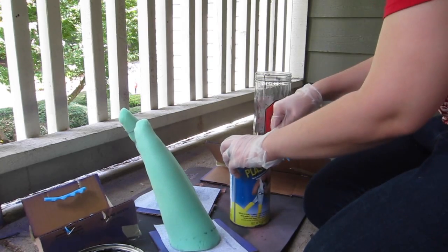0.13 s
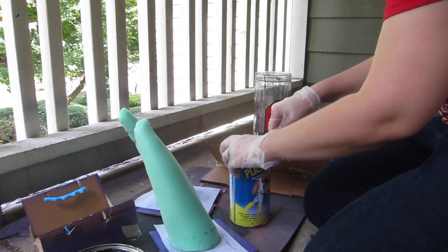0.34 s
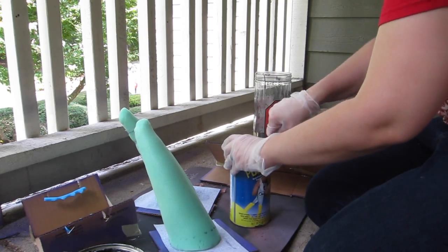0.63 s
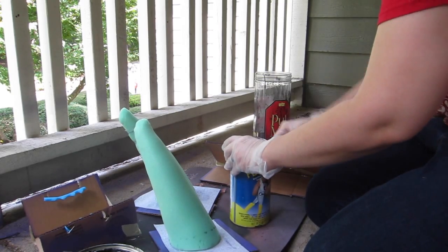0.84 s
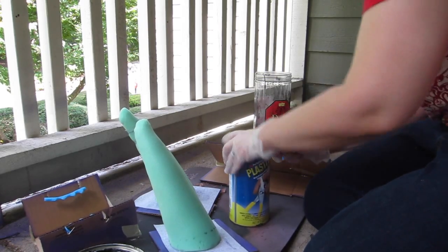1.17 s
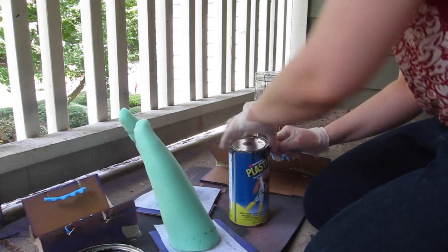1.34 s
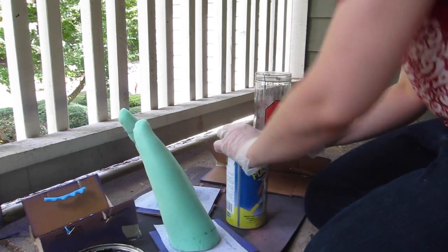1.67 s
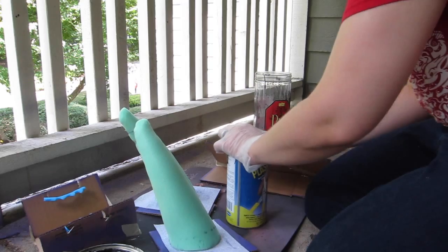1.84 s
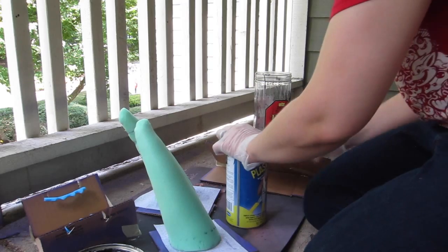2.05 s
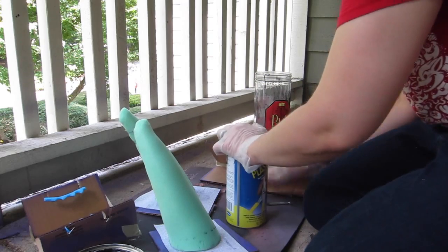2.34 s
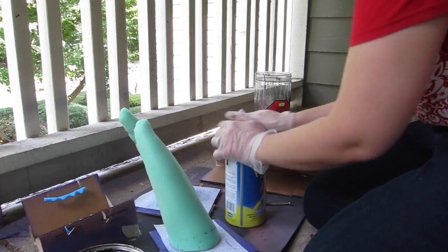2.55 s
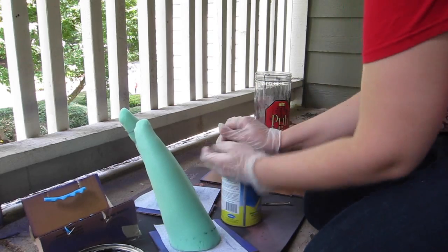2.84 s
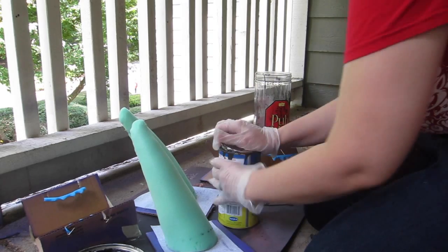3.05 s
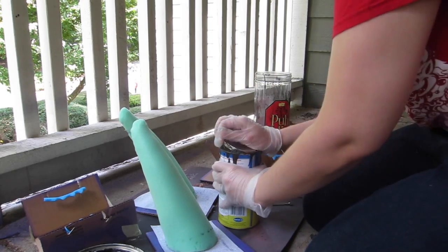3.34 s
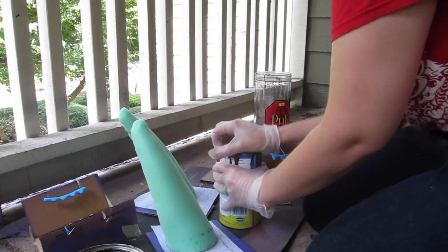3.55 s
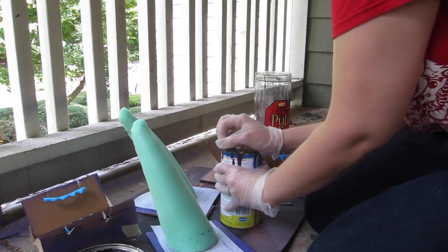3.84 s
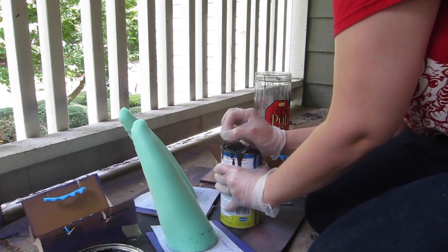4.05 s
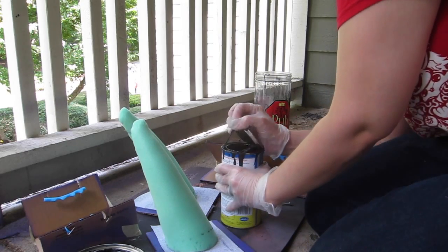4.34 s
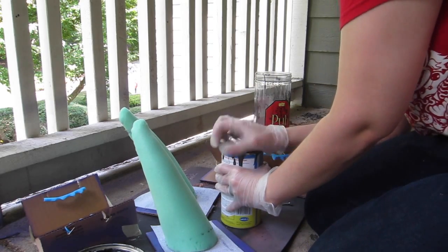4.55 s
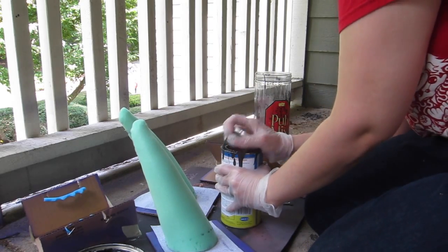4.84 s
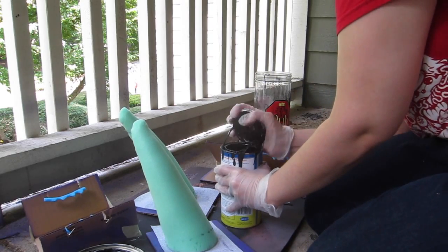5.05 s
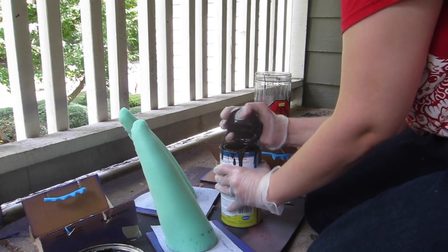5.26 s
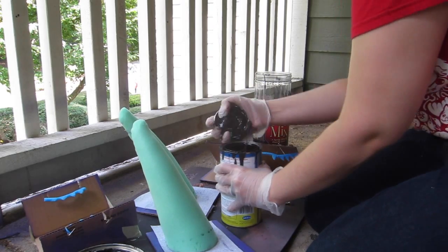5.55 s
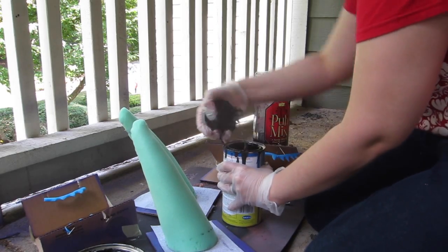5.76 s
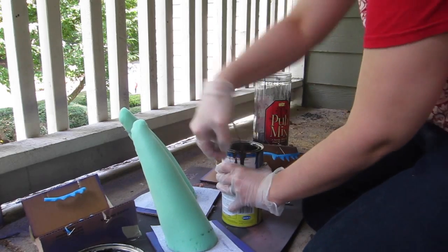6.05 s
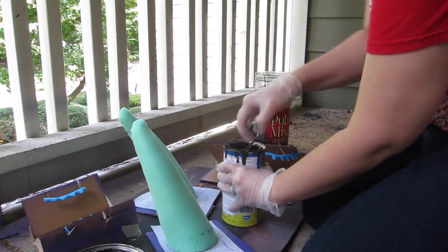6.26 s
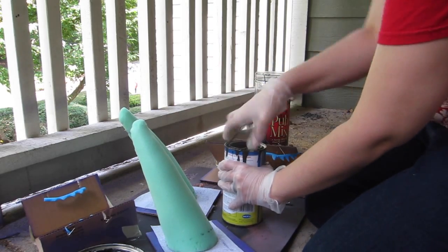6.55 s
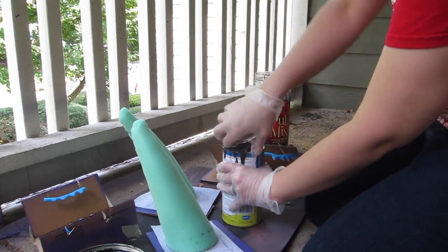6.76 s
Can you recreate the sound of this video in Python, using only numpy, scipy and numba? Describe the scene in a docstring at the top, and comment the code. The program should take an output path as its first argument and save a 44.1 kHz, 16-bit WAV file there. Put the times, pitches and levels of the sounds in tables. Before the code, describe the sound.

A close stereo microphone on an outdoor wooden porch, with a short echo off boards. Wavering road roar and low far engine drones run throughout, one slowly rising in pitch, with a faint fan-like tone. From 0.5 s thin gloves rustle and scrape; sharp lid ticks cluster at 0.9-1.1 s, with more at 1.6-1.7 s, including a tiny squeak, and at 2.0 s. At 2.4 s a quick hollow metal knock rattles on the tin. Gritty rubbing continues until 3.9 s, when a hard crack releases the rim, with low sagging air plops until 4.3 s. After scattered clicks, bright, sizzling snaps crowd 5.0-5.8 s, the loudest stretch, with short, damped metallic ringing. A fine stuttering creak speeds up around 6.0 s. Then only light rustles and a few small ticks remain, while smooth distant tyre hiss swells to the end at 6.9 s.

```python
"""Prising the lid off a paint tin

Gloved hands work the lid off a full paint tin on a wooden porch, an arm's length from a small camera.
Gloves, squeaks and traffic are filtered noise; lid and tin are sums of fading tones set off by blows.
Ticks and creaks are short snaps, plops are sagging sine tones. Far engines hum as wavering tones,
one of them gathering speed, and a tyre hiss comes up at the end. Gain control ducks the loud peaks.
"""
import sys
import numpy as np
from scipy import signal
from scipy.fft import rfft, irfft, next_fast_len
from scipy.io import wavfile
from scipy.ndimage import uniform_filter1d
from numba import njit

SR = 44100
rng = np.random.default_rng(int(sys.argv[2]) if len(sys.argv) > 2 else 0)


def wav_record(signal):
    """Record a signal, one row per channel, as 16-bit PCM in the file named by sys.argv[1]."""
    frames = np.transpose(np.atleast_2d(signal))
    bounded = np.clip(frames, -1, 1)
    # unit amplitude maps onto the largest positive 16-bit level
    quanta = np.round(bounded * 32767).astype(np.int16)
    wavfile.write(sys.argv[1], SR, quanta)


N = 305172
T = np.arange(N) / SR  # time in s
OPPOSITE = np.array([[1], [-1]])  # adds to the left what it takes from the right


def undb(db):
    """Turn dB into a plain gain."""
    return 10 ** (np.asarray(db) / 20)


def unit(x):
    """Scale a sound to an average (rms) level of 1."""
    return x / np.sqrt(np.mean(x ** 2))


def curve(rows):
    """Join the points of a table whose first column is t/s; one signal per further column."""
    s, *columns = np.transpose(rows)
    return [np.interp(T, s, column) for column in columns]


def at(hz, rows):
    """Read a table of (f/Hz, value) at any frequency, along a log axis."""
    f, value = np.transpose(rows)
    return np.interp(np.log(hz), np.log(f), value)


def band(x, hz, width):
    """Pass a sound through a resonance with gain 1 at its centre; both settings in Hz."""
    return signal.lfilter(*signal.iirpeak(hz, hz / width, SR), x)


@njit
def sweep(x, hz, width):
    """Resonance with a moving centre: two linked stores (state-variable filter) updated each sample."""
    y, b, l = np.empty(len(x)), 0., 0.
    for i in range(len(x)):
        g, k = np.tan(np.pi * hz[i] / SR), width / hz[i]
        v = (b + g * (x[i] - l)) / (1 + g * (g + k))
        b, l, y[i] = 2 * v - b, l + 2 * g * v, k * v
    return y


def walk(rate):
    """Random wander with an rms of 1, taking about `rate` new values a second."""
    step = 64  # samples sharing one value
    hold = max(int(SR / step / rate), 2)
    size = N // step + 2
    stairs = np.repeat(rng.standard_normal(size // hold + 1), hold)
    smooth = uniform_filter1d(uniform_filter1d(stairs, hold), hold)[:size]
    return np.repeat(unit(smooth), step)[:N]


def add(out, s, sound, pan_db):
    """Place a sound at time s in the stereo picture; pan_db is left minus right."""
    i = int(s * SR)
    out[:, i:i + sound.shape[-1]] += sound * undb([[pan_db / 2], [-pan_db / 2]])


def crack(hz, width, t60, apart, size=1500):
    """A snap: a jolt and a noise tail through a resonance, peak 1, a little different left and right."""
    t = np.arange(size) / SR
    mid, side = rng.standard_normal((2, size))
    mid[0] = 7.  # the first jolt stands out
    # t60 is the time to fade by 60 dB; a weaker part lasts five times longer
    fade = undb(-60 * t / t60) + 0.14 * undb(-60 * t / (5 * t60))
    jolt = (mid + apart * side * OPPOSITE) * fade
    y = band(band(jolt, hz, width), hz, width)
    return y / np.max(np.abs(y.mean(axis=0)))


def ring(modes, scatter_db, size=3000):
    """Metal after one blow: fading tones, peak 1; their levels and pitches vary from blow to blow."""
    t = np.arange(size) / SR
    hz, db, t60 = np.transpose(modes)[:, :, None]
    luck = rng.standard_normal((len(modes), 2))
    pitch = hz + 0.63 * luck[:, 1:] / t60  # the tones that die soonest shift most
    swing = np.sin(2 * np.pi * pitch * t) * np.exp(-np.log(1000) * t / t60)
    sign = np.sign(rng.standard_normal((len(modes), 1)))
    y = np.sum(undb(db + scatter_db * luck[:, :1]) * swing * sign, axis=0)
    return y / np.max(np.abs(y))


def traffic():
    """Road roar: noise in bands about half an octave wide (the top one wider), each wavering by itself."""
    # tone colour of the roar: f/Hz, relative level per Hz/dB
    roar_colour = [(13, -34), (25, -5.5), (50, -6), (92, -1), (132, -9), (152, -13), (184, -10), (229, -19),
                   (270, -15), (295, -15), (330, -11.5), (400, -14), (510, -14.5), (1270, -19),
                   (2200, -25.5), (4260, -38), (7000, -46.5), (10000, -53), (16000, -86)]
    # how alike the two sides are: f/Hz, likeness (1 is the same)
    likeness = [(60, 0.87), (290, 0.97), (640, 0.95), (1410, 0.57), (3100, 0.021), (15000, 0.035)]
    # stereo balance: f/Hz, left minus right/dB
    balance = [(60, -0.5), (110, -3), (200, -2), (380, 0), (700, -2.5), (1290, 0), (2380, -2), (4400, -0.5),
               (8120, 4), (15000, -1)]
    level_db = -27.5  # average level of the 150-3000 Hz part
    rumble_hz = 200
    rumble_fade_db_s, roar_fade_db_s = 0.68, 0.38  # the deep roar draws away faster than the rest
    size = next_fast_len(N)
    hz = np.fft.rfftfreq(size, 1 / SR) + 1  # the extra 1 avoids log(0)
    roar = rfft(rng.standard_normal((2, size))) * undb(at(hz, roar_colour))
    # the rumble is one noise for both sides, a little ahead on one of them
    roar[1] = np.where(hz < rumble_hz, 1j * roar[0], roar[1])
    edges = np.append(20 * 2 ** np.arange(0, 7.1, .5), [3600, 5000, SR / 2])
    swell = walk(0.46)
    out = 0
    for lo, hi in zip(edges, edges[1:]):
        mid, side = irfft(roar * ((hz >= lo) & (hz < hi)), size)[:, :N]
        centre = np.sqrt(lo * hi)
        alike = np.clip(at(centre, likeness), 0, 1)
        lean = at(centre, balance) / 2
        pair = np.sqrt(1 + alike) * mid + np.sqrt(1 - alike) * side * OPPOSITE
        fade = T * (rumble_fade_db_s if centre < rumble_hz else roar_fade_db_s)
        waver = min(1.35, 1500 / centre) * walk(3.468)
        out = out + pair * undb([[lean], [-lean]]) * undb(.5 * swell + waver - fade)
    body_filter = signal.butter(4, [150, 3000], "band", fs=SR, output="sos")
    body = signal.sosfilt(body_filter, out.mean(axis=0))
    return out * undb(level_db) / np.sqrt(np.mean(body ** 2))


def far_tone(hz, db, second_db, waver_db, half_db=-60., drift=.006):
    """A far hum: a tone with octaves above and below it, wavering in pitch and level on the wind."""
    phase = 2 * np.pi * np.cumsum(hz * (1 + drift * walk(6))) / SR
    octaves = undb(second_db) * np.sin(2 * phase) + undb(half_db) * np.sin(phase / 2)
    tone = np.sqrt(2) * (np.sin(phase) + octaves)
    return tone * undb(db + waver_db * walk(6.94)) * undb([[-1.1], [1.1]])  # leans right


def engines():
    """Far engines: only the beat of the firing carries, as a low tone with weaker octaves."""
    # three engines, the first gathering speed: t/s, firing f/Hz, level before wavering/dB
    lorry = [(0, 47.3, -41), (.6, 50.77, -35), (1, 52.96, -28.5), (2, 59.43, -27.5), (2.7, 62.3, -33),
             (3.5, 66.37, -29), (4.3, 66.8, -37), (5, 68.2, -36), (6, 70.5, -30.5), (6.92, 71.3, -31.5)]
    drone = [(0, 87, -47), (.9, 87, -30), (1.6, 87.16, -28), (2.2, 87.15, -28.5), (2.8, 91, -30.5),
             (3.5, 90.2, -24), (4.2, 92.1, -29.5), (4.6, 92.9, -29.5), (5.2, 94.25, -46), (6.92, 95.8, -47)]
    hum = [(0, 127, -29), (1, 122.3, -34.5), (1.8, 124, -35.5), (2.2, 125.9, -33), (2.7, 132, -33),
           (3.1, 134, -45), (5.8, 125, -52), (6.2, 125, -49.5), (6.92, 125.8, -40)]
    out = far_tone(*curve(lorry), second_db=-20.5, waver_db=0.65)
    out = out + far_tone(*curve(drone), second_db=-17.5, waver_db=2.4, half_db=-6.0)
    return out + far_tone(*curve(hum), second_db=-21.0, waver_db=1.7)


def faint_tones():
    """A fan tone that comes and goes, and a faint far tone that comes up late; both nearly pure."""
    # the fan and the other tone: t/s, f/Hz, level before wavering/dB
    fan = [(0, 326, -42), (1, 326, -38.5), (1.5, 330, -51), (2.2, 335, -46), (3.2, 330, -45), (4, 330, -51),
           (5, 326, -47), (6.92, 322, -49)]
    late_tone = [(0, 478, -70), (5.7, 478, -58), (6.0, 479, -43), (6.5, 483, -41), (6.92, 486, -42)]
    out = far_tone(*curve(fan), second_db=-32.0, waver_db=2.8)
    return out + far_tone(*curve(late_tone), second_db=-30., waver_db=1.14, drift=.002)


def rustle(db, hz, width, grain_db, apart, rough_db):
    """Dense tiny slips, a few standing out, in uneven bunches, through a resonance that can move."""
    size = np.minimum(rng.exponential(size=N), 7)
    slips = rng.standard_normal((2, N)) * undb(grain_db * size)
    mid, side = (unit(sweep(sweep(v, hz, width), hz, width)) for v in slips)
    bunches_db = 1.6 * walk(40) + rough_db * walk(170)
    return (mid + apart * side * OPPOSITE) * undb(db + bunches_db)


def grit(scrape_db, hz, count):
    """Now and then the vinyl catches and snaps free, more often and harder where the scrape is loud."""
    above_db, scatter_db = 8, 3.5  # snap peak above the scrape, and its spread
    travel = np.cumsum(undb(scrape_db[:N - 600]))  # grows fastest where the scrape is loud
    out = np.zeros((2, N))
    for when, (size, pitch, pan) in zip(rng.random(count), rng.standard_normal((count, 3))):
        i = np.searchsorted(travel, when * travel[-1])
        snap_hz = np.clip(hz[i] * 2 ** (.5 * pitch - .3), 1500, 7000)
        snap = crack(snap_hz, width=2900.0, t60=0.0045, apart=0.41, size=600)
        snap_db = scrape_db[i] + above_db + scatter_db * min(size, .8)
        add(out, i / SR, undb(snap_db) * snap, 2 * pan)
    return out


def gloves():
    """Vinyl dragged over tin and skin: each stroke rises, holds and dies; sizzle above, scrape below."""
    # strokes of the gloves: full at t/s, rise/s, hold/s, then before the roughness is added
    # sizzle level/dB, scrape level/dB, and scrape centre f/Hz
    strokes = [(0.497, .05, .08, -56, -53.5, 3480), (0.611, .01, .01, -54, -38, 5000),
               (0.735, 0.017, 0.023, -47, -46, 3200), (0.879, 0.037, .03, -42, -35.5, 5800),
               (0.92, .04, 0.055, -54, -32, 5200), (.99, .01, .02, -56, -39, 5500),
               (1.042, .02, .01, -47, -38, 5100), (1.128, .01, .01, -62, -39.5, 5200),
               (1.193, 0.07, 0.092, -51, -49, 4500), (1.304, 0.028, .01, -49, -47, 3500),
               (1.524, .1, 0.0064, -54, -44, 3583), (1.614, 0.025, .03, -65, -32, 3850),
               (1.65, 0.035, 0.02, -57, -30, 4460), (2.03, 0.022, 0.0085, -49, -33.5, 4600),
               (2.31, 0.062, 0.044, -41, -37.5, 3927), (2.373, 0.04, 0.048, -51, -34.5, 3600),
               (2.412, 0.018, 0.043, -40, -36, 3380), (2.538, 0.048, 0.056, -63, -40.5, 3300),
               (2.629, 0.053, 0.055, -44, -43.5, 4200), (2.737, 0.088, 0.011, -29, -37.5, 4930),
               (2.854, 0.15, 0.015, -57, -34, 3800), (2.941, 0.11, 0.09, -46, -39, 3557),
               (3.043, 0.1, 0.06, -41, -33, 3700), (3.128, 0.035, .04, -45, -40, 4200),
               (3.184, .04, 0.1, -66, -46.5, 3500), (3.336, .1, 0.12, -56, -48, 3600),
               (3.55, 0.056, .03, -38.5, -40, 4410), (3.681, 0.048, 0.0085, -47, -45, 3800),
               (3.782, 0.09, .01, -48, -44.5, 3500), (3.901, 0.032, 0.0086, -42, -32, 4300),
               (3.95, .04, 0.012, -35, -49, 5000), (4.017, 0.028, 0.055, -30.5, -34, 5800),
               (4.096, 0.022, .08, -33, -43, 5600), (4.275, 0.016, 0.0073, -35, -38, 5400),
               (4.557, 0.018, 0.043, -45, -46, 4100), (4.61, 0.033, 0.0072, -40, -41.5, 4000),
               (4.66, .03, 0.0089, -44, -36.5, 4100), (4.714, 0.024, 0.0073, -38.5, -38, 3900),
               (4.818, 0.038, .01, -39.5, -50, 3700), (4.937, 0.066, .01, -37, -36.5, 5300),
               (4.984, .04, 0.035, -32, -35, 4500), (5.077, 0.036, 0.089, -31, -31, 4700),
               (5.222, .03, .03, -43, -46, 4700), (5.283, .04, .02, -37.5, -45, 4500),
               (5.315, 0.008, 0.07, -34, -37, 5350), (5.438, .05, .01, -24, -27.5, 5000),
               (5.511, 0.027, 0.033, -28.5, -30.5, 5500), (5.603, 0.006, 0.0082, -40, -32, 4400),
               (5.639, 0.0068, 0.012, -31, -29, 4300), (5.738, .006, .01, -40, -35, 3800),
               (5.793, 0.0065, 0.012, -48, -37, 4320), (5.839, .04, 0.043, -44, -45, 4200),
               (6.015, 0.048, 0.033, -35, -55.5, 4940), (6.247, .02, 0.0092, -52, -45.5, 3450),
               (6.352, 0.036, 0.0051, -46, -53, 3460), (6.512, .1, 0.14, -53, -52, 3870),
               (6.818, 0.059, 0.061, -38.5, -57, 3300)]
    rise_db, fall_db_s = 26, 309.5  # climb during the rise, and speed of dying away
    rest_sizzle_db, rest_scrape_db, rest_hz = -62.5, -55.5, 3020  # the hands are never quite still
    sizzle_hz, grit_per_s = 10100, 110
    # powers add up where strokes overlap
    sizzle, scrape = undb(2 * rest_sizzle_db), undb(2 * rest_scrape_db)
    centre = scrape * rest_hz
    t = T[::16]  # a coarser clock is enough for the strokes
    for s, rise, hold, sizzle_db, scrape_db, hz in strokes:
        climb_db = rise_db * (t - s) / rise
        drop_db = -fall_db_s * (t - s - hold)
        power = undb(2 * np.minimum(0, np.minimum(climb_db, drop_db)))
        sizzle = sizzle + power * undb(2 * sizzle_db)
        scrape = scrape + power * undb(2 * scrape_db)
        centre = centre + power * undb(2 * scrape_db) * hz
    sizzle, scrape, centre = (np.repeat(v, 16)[:N] for v in (sizzle, scrape, centre))
    high = rustle(10 * np.log10(sizzle), np.full(N, 1. * sizzle_hz), width=12700.0,
                  grain_db=3.3, apart=0.74, rough_db=1.8)
    scrape_db = 10 * np.log10(scrape)
    scrape_hz = centre / scrape  # the louder strokes pull the centre towards theirs
    low = rustle(scrape_db, scrape_hz, width=8200.0, grain_db=4.1, apart=0.49, rough_db=1.7)
    return high + low + grit(scrape_db, scrape_hz, count=int(grit_per_s * N / SR))


def lid_ticks(out):
    """The rim lets go in snaps and sizzles, and each jolt makes the hand-damped lid ring."""
    # ticks: t/s, crack peak level/dB, crack centre f/Hz, sizzle peak level/dB, lid ring peak level/dB
    tick_rows = [(0.608, -17.5, 4400, -10, -17), (0.7327, -21.5, 2890, -28, -26),
                 (0.7499, -23, 3080, -24, -42), (0.868, -33, 5300, -28, -40), (0.9067, -9, 2560, -32, -23),
                 (0.9196, -6.5, 5500, -13, -40), (0.925, -10, 5300, -20, -40),
                 (0.9517, -5.5, 5030, -16, -15.5), (0.9635, -18, 4500, -30, -27),
                 (0.924, -14, 4200, -30, -35), (0.94, -17, 3200, -30, -28), (0.973, -13.5, 5900, -29, -32),
                 (1.021, -27, 5000, -35, -40), (1.034, -23, 5350, -22, -42), (1.1202, -9, 6170, -41, -38),
                 (1.18, -35, 6000, -29, -45), (1.195, -38, 6000, -27, -45), (1.623, -13, 3930, -38, -38),
                 (1.625, -19, 4600, -38, -33), (1.655, -17, 3180, -35, -22), (1.678, -21, 2900, -39, -11),
                 (1.641, -20, 5800, -38, -30), (1.648, -22, 2000, -40, -22), (1.662, -16, 5000, -38, -30),
                 (1.668, -19, 6100, -38, -30), (1.7, -31, 5500, -40, -40), (1.689, -28, 2597, -40, -22),
                 (1.807, -26, 5400, -23, -36), (1.8606, -24, 4027, -17.5, -35),
                 (1.9994, -23, 2990, -25, -40), (2.03, -12, 3240, -13.5, -11.5),
                 (2.3361, -29, 3480, -34, -31), (2.399, -10, 3780, -31, -18), (2.411, -10, 3440, -7.5, -34),
                 (2.992, -14.5, 4560, -17, -21), (3.155, -31, 4800, -36, -47), (3.558, -32, 3900, -16, -40),
                 (3.868, -20, 3500, -21, -42), (3.897, -4.5, 4580, -28, -15), (3.906, 3, 4630, -6, -5),
                 (3.971, -37, 3600, -18, -39), (4.005, -29, 4200, -12, -26), (4.048, -11.5, 4900, -22, -16),
                 (4.026, -24, 4950, -21, -35), (4.038, -20, 4960, -16.5, -35), (4.0796, -22, 4500, -3, -13),
                 (4.0918, -6.5, 5830, -4.5, -40), (4.132, -16, 5500, -8, -17),
                 (4.2022, -14, 5800, -18.5, -32), (4.2698, -19, 5100, -9, -8), (4.283, -16, 6540, -21, -32),
                 (4.2877, -20, 6500, -9.5, -35), (4.389, -41, 5000, -27, -42),
                 (4.6184, -21, 5000, -16, -12), (4.66, -17, 4050, -20, -21.5), (4.889, -37, 5490, -23, -40),
                 (4.933, -35, 5570, -12.5, -42), (4.946, -21, 3000, -25, -30),
                 (4.9872, -11.5, 3780, -1.5, -9.5), (5.0015, -22, 3500, -20, -22),
                 (5.017, -27, 4000, -22, -24), (5.091, -20, 4500, -18, -24), (5.007, -17, 4500, -25, -28),
                 (5.0787, 1.5, 4700, 1, -8), (5.104, -16, 5500, -13, -14), (5.1126, -3, 6040, 2, -12),
                 (5.127, -15, 5700, -7, -10), (5.136, -3, 5700, -8, -37), (5.1553, 6.5, 5460, -25, -7.5),
                 (5.308, -21, 5000, -2.5, -10.5), (5.33, -12, 5170, -1, -22), (5.3471, -8, 5100, 8.5, -5.5),
                 (5.354, -16, 6000, -4, -27), (5.361, -19, 4500, -6, -30), (5.436, 2, 6390, 8.5, -8),
                 (5.452, -20, 3600, -20, -24), (5.4985, -22, 4190, -5, -11), (5.5104, -13, 6000, 0, -35),
                 (5.527, -5.5, 5800, -22, -29.5), (5.5395, -21, 5100, -26, -18), (5.6, -4, 4750, 3, -0.5),
                 (5.611, -33, 5900, -13, -20), (5.645, -4.5, 5000, 2.5, -8.5), (5.7333, -5.5, 2680, 0, -33),
                 (5.734, -9, 5630, -30, -40), (5.746, -44, 3500, -25, -28), (5.7856, -6, 5450, -5, -17),
                 (5.797, -22, 3500, -21, -35), (5.831, -37, 4990, -12, -64), (5.876, -22, 4900, -14, -15.5),
                 (6.2567, -21, 5030, -19.5, -35), (6.327, -38, 5000, -24, -45),
                 (6.347, -24, 5230, -13.5, -31)]
    # tones of the lid when nothing holds it: f/Hz, relative level/dB, time to fade by 60 dB/s
    lid_modes = [(1640, 1, 0.02), (1776, 1, 0.05), (1930, 2, 0.025), (2200, -2, .02), (2562, -10, 0.03),
                 (3560, -7, 0.03), (4323, -6, .025), (4600, -12, .025), (5356, -11, .025),
                 (6013, -12, .025), (7000, -14, 0.02)]
    pan_scatter_db = 6  # ticks spread left and right round the rim
    grip = .17  # least share of its ring time left to the held lid; a hard tick shakes it loose
    for s, db, hz, sizzle_db, ring_db in tick_rows:
        pan = pan_scatter_db * rng.standard_normal()
        snap = undb(db) * crack(hz, width=0.54 * hz, t60=.009, apart=1.0)
        sizzle = undb(sizzle_db) * crack(9180.0, width=5800.0, t60=0.011, apart=1.0)
        add(out, s, snap + sizzle, pan)
        free = grip + (1 - grip) * min(undb(1.7 * ring_db), 1)
        bend = 1 + .05 * (1 - free) * rng.standard_normal()  # the grip also shifts the pitch
        held = [(f * bend, mode_db, t60 * free) for f, mode_db, t60 in lid_modes]
        add(out, s, undb(ring_db) * ring(held, scatter_db=4.), pan)
    return out


def squeak():
    """Narrow, shaky whistles of rubbing and a low groan: noise through a sharp resonance."""
    # squeaks: start t/s, end t/s, centre f/Hz, width/Hz, level/dB
    squeak_rows = [(.76, .95, 830, 250, -36), (.884, .899, 5500, 700, -33), (1.651, 1.671, 3100, 480, -26),
                   (1.655, 1.672, 6200, 700, -34), (1.632, 1.655, 4200, 500, -36),
                   (4.016, 4.032, 4600, 500, -37), (2.352, 2.435, 12000, 400, -41),
                   (3.95, 3.978, 11700, 700, -38), (4.095, 4.19, 11800, 600, -36),
                   (4.1, 4.19, 13300, 900, -40)]
    out = 0
    for start, end, hz, width, db in squeak_rows:
        on = np.clip(np.minimum(T - start, end - T) / 0.0023, 0, 1)  # soft start and end
        whistle = unit(band(band(rng.standard_normal(N), hz, width), hz, width))
        out = out + whistle * undb(db) * on
    return out


def tin_knocks(out):
    """Knocks on the tin wall: a hard contact favours the upper tones, a soft one the lower."""
    # knocks: t/s, peak level/dB, contact f/Hz (higher is harder)
    knock_rows = [(2.337, -22, 6000), (2.341, -21, 2200), (2.3535, -15, 1500), (2.366, -14, 1500),
                  (2.383, -22, 6000), (2.399, -3, 1900), (2.4015, -9, 2400), (2.4108, 4, 5000),
                  (2.4132, 2, 2100), (2.4245, 0, 1700), (2.4255, -14, 6000), (2.437, -12, 1700),
                  (2.448, -20, 1700)]
    # tones of the tin: f/Hz, level before the contact weights it/dB, time to fade by 60 dB/s
    tin_modes = [(522, -3, .04), (680, -3, .035), (1010, 1, .055), (1095, 0, .045), (1230, -4, .03),
                 (1520, -2, .03), (1630, 1, .035), (2150, -7, .02), (2470, -3, .025), (2780, -4, .025),
                 (3230, -2, .025), (3450, -4, .02), (3740, -2, .025)]
    for s, db, contact_hz in knock_rows:
        reached = []
        for hz, mode_db, t60 in tin_modes:
            # strongest in the octave or so below the contact's own pitch
            too_far = (hz / contact_hz) ** 4 + (0.34 * contact_hz / hz) ** 4
            reached.append((hz, mode_db - 10 * np.log10(1 + too_far), t60))
        add(out, s, undb(db) * ring(reached, scatter_db=1.5), -1.5)
    return out


def air_plops(out):
    """The air under the lid plops, mostly higher as the gap widens: a sagging tone and a soft noise."""
    # plops: t/s, tone peak level/dB, starting f/Hz, time for the tone to fade by 60 dB/s
    plop_rows = [(3.862, -21, 500, .05), (3.868, -16, 385, .1), (3.905, -18, 450, .06),
                 (3.905, -22, 590, .04), (3.921, -15, 462, .08), (3.952, -21, 460, .14),
                 (4.046, -19, 565, .08), (4.092, -15, 595, .1), (4.268, -19.5, 705, .12),
                 (4.271, -21, 590, .06)]
    glide_per_s = -.8  # the pitch sags by this share of its start each second
    t = T[:9000]
    for s, db, hz, t60 in plop_rows:
        tone = np.sin(2 * np.pi * hz * t * (1 + glide_per_s * t / 2)) * undb(-60 * t / t60)
        puff = .55 * crack(hz, width=170.0, t60=0.06, apart=.1, size=9000)
        add(out, s, undb(db) * (tone + puff), -1.)
    return out


def creak(out):
    """Stick-slip: the surfaces stick and jump in a run of snaps that weakens towards the end."""
    # creaks, the second speeding up until it blurs: start t/s, first gap/s,
    # factor on the gap's excess over the least gap, least gap/s, end t/s, first peak level/dB, centre f/Hz
    creak_rows = [(5.841, .014, 1.07, .001, 5.885, -15, 12000),
                  (5.9908, .0108, .69, .001, 6.095, -11, 10300)]
    for start, gap, change, least, end, db, hz in creak_rows:
        s = start
        while s < end:
            fade = ((s - start) / (end - start)) ** 1.5
            late = .1 * gap * rng.random()  # small unevenness in time
            slip = crack(hz, width=2250.0, t60=0.005, apart=0.93, size=600)
            add(out, s + late, undb(db - 25.0 * fade) * slip, 3.)
            s, gap = s + gap, least + (gap - least) * change
    return out


def wash():
    """Smooth hiss of distant tyres coming up at the end: separate noise left and right."""
    # tyre hiss: t/s, level/dB, centre f/Hz
    wash_rows = [(0, -68, 2700), (6.1, -70, 2700), (6.6, -44.5, 2730), (6.92, -38.5, 2804)]
    db, hz = curve(wash_rows)
    return np.array([unit(sweep(v, hz, 480.0)) for v in rng.standard_normal((2, N))]) * undb(db)


def porch_echo(near):
    """Echo off boards and wall: the near sounds smeared by a short tail of fading noise."""
    fade_60db_s, level_db = 0.22, -14.5
    t = np.arange(int(.2 * SR)) / SR
    tail = rng.standard_normal((2, len(t))) * undb(-60 * t / fade_60db_s)
    tail *= t > .002  # the first echo comes a moment later
    tail /= np.sqrt(np.sum(tail ** 2, axis=1, keepdims=True))
    return undb(level_db) * signal.oaconvolve(near, tail, axes=1)[:, :N]


def scene():
    """Hands and tin with their echo, in front of the road."""
    road = traffic() + engines() + faint_tones()
    near = gloves() + squeak()
    for add_sounds in (lid_ticks, tin_knocks, air_plops, creak):
        near = add_sounds(near)
    return near + porch_echo(near) + road + wash()


@njit
def follow(size, attack, release):
    """Peak follower: climbs fast, sinks at a steady rate in dB."""
    e, out = 1e-3, np.empty(len(size))
    for i in range(len(size)):
        e = e + attack * (size[i] - e) if size[i] > e else e * release
        out[i] = e
    return out


def record(dry):
    """The housing notches and dulls the treble; gain ducks after peaks; hard ceiling; steep top cut."""
    notch_hz, notch_width_hz = (8230, 8220), 3200  # left and right port
    dull_hz, top_hz = 14700, 16300
    gain_top, attack_s, recover_db_s = 0.52, 0.00059, 12.5  # peaks above gain_top are turned down
    mic = np.array([signal.lfilter(*signal.iirnotch(hz, hz / notch_width_hz, SR), v)
                    for hz, v in zip(notch_hz, dry)])
    mic = signal.sosfilt(signal.butter(4, dull_hz, fs=SR, output="sos"), mic)
    release = float(undb(-recover_db_s / SR))
    peak = follow(np.max(np.abs(mic), axis=0), 1 / (attack_s * SR), release)
    ducked = np.clip(mic * np.minimum(gain_top / peak, 1), -1, 1)
    return signal.sosfilt(signal.ellip(12, .2, 95, top_hz, fs=SR, output="sos"), ducked)


dry = scene()
out = record(dry)
wav_record(out)
```